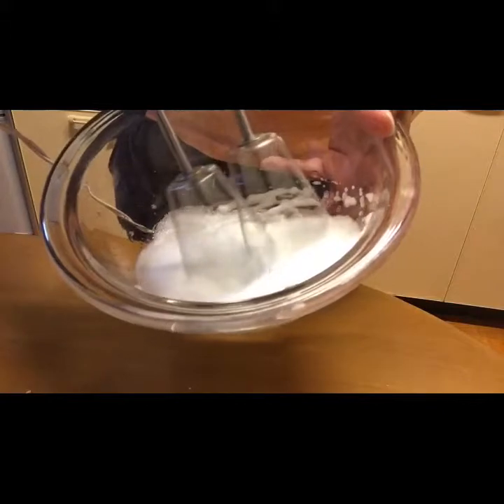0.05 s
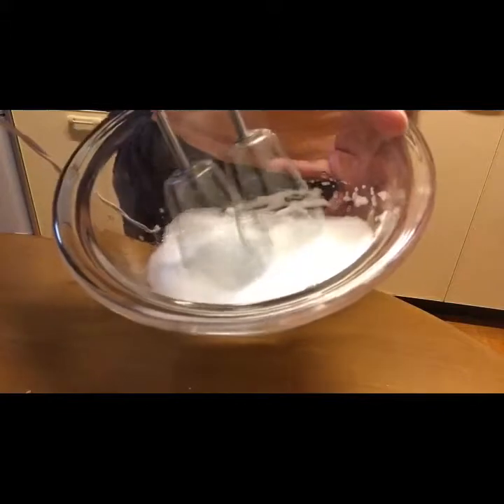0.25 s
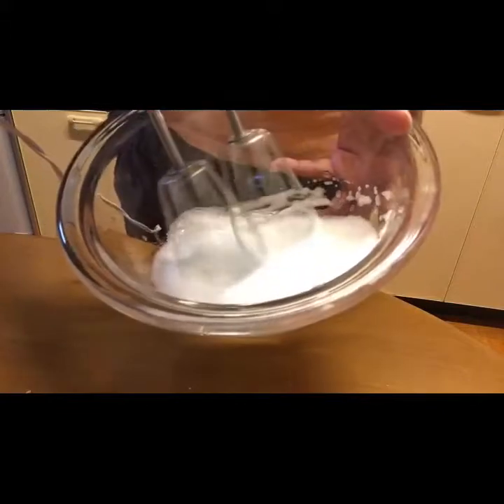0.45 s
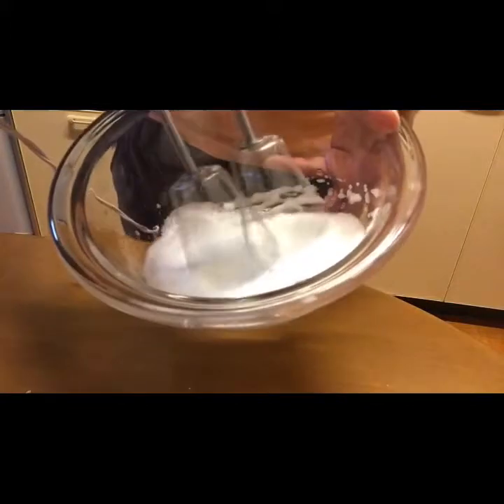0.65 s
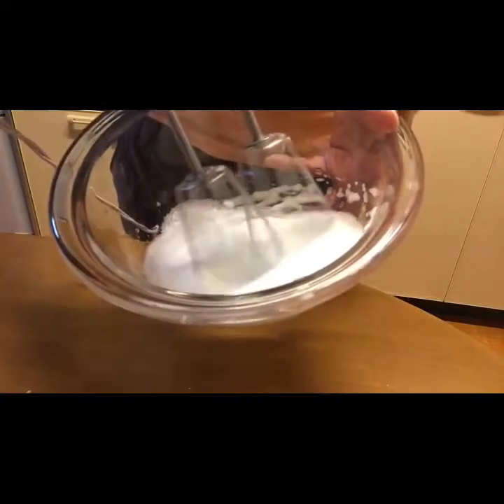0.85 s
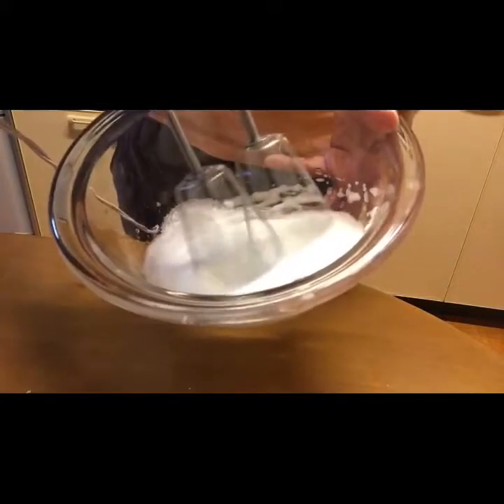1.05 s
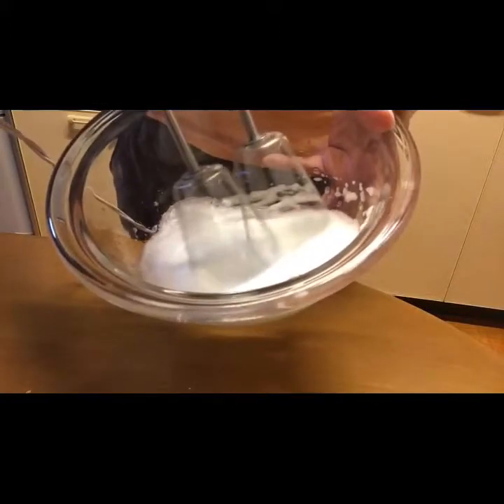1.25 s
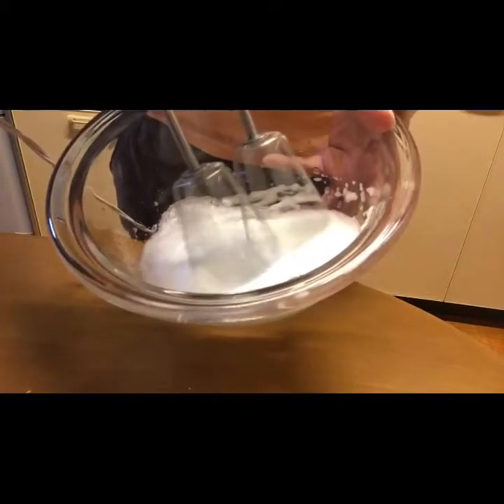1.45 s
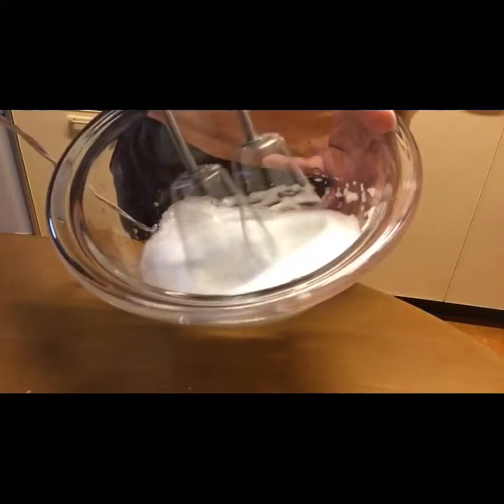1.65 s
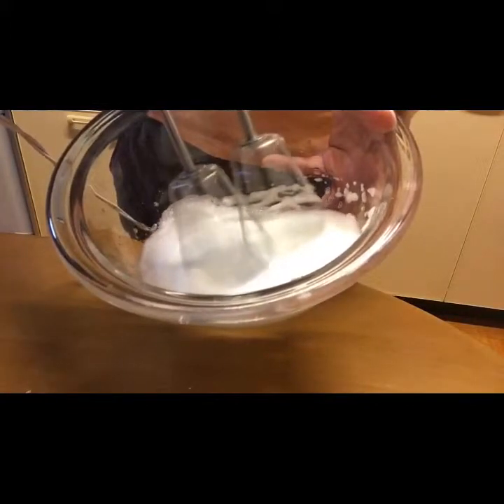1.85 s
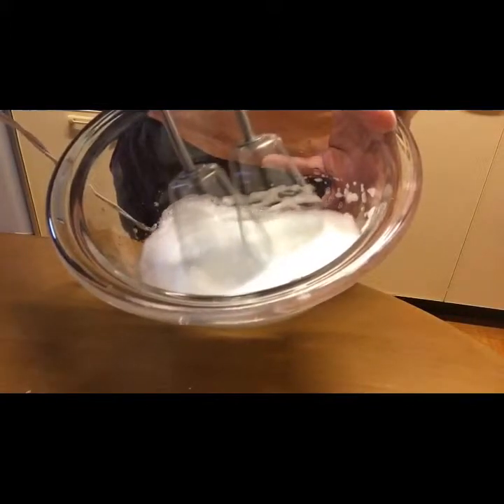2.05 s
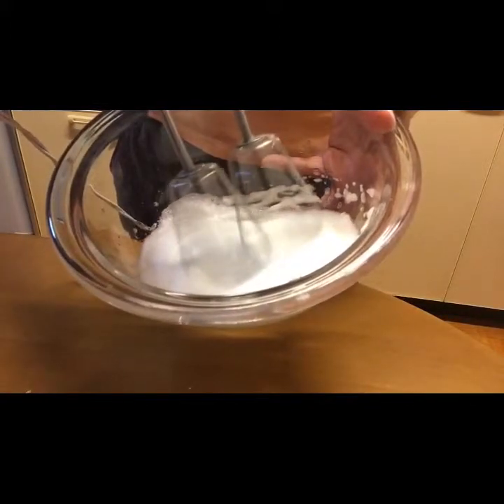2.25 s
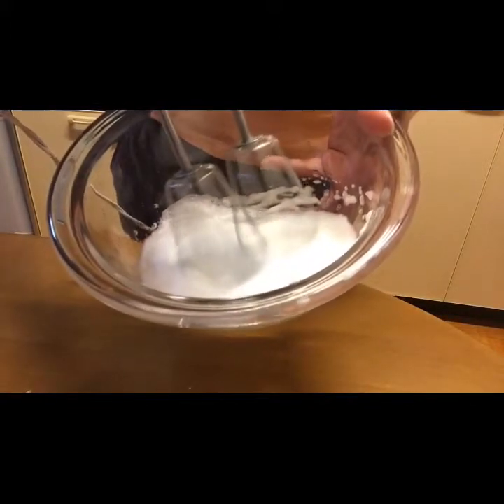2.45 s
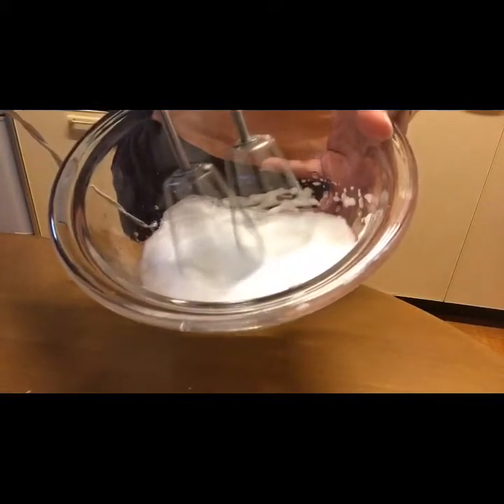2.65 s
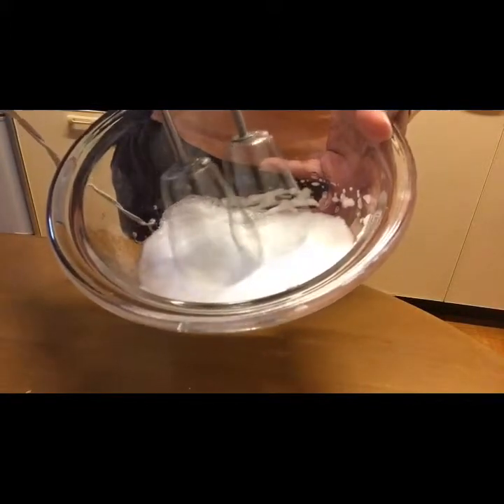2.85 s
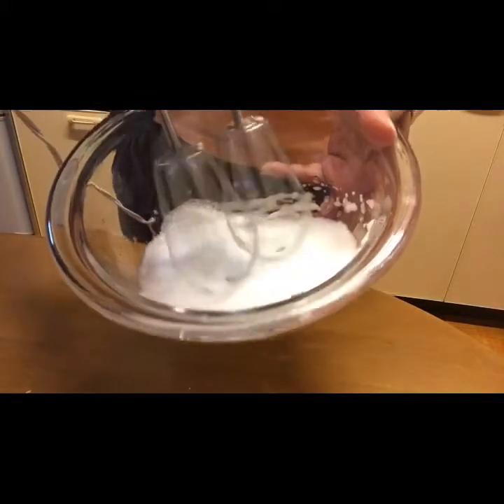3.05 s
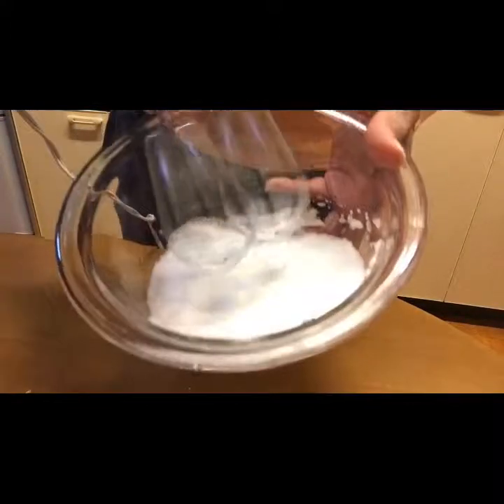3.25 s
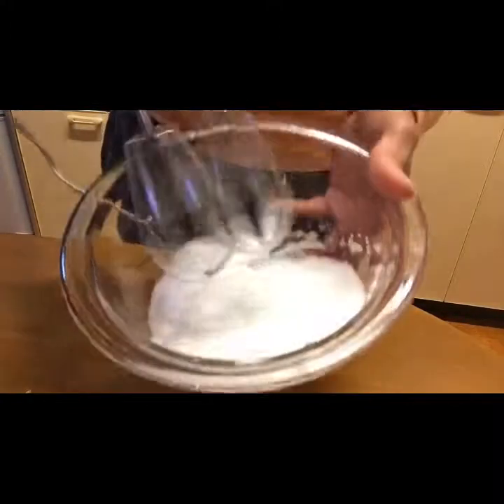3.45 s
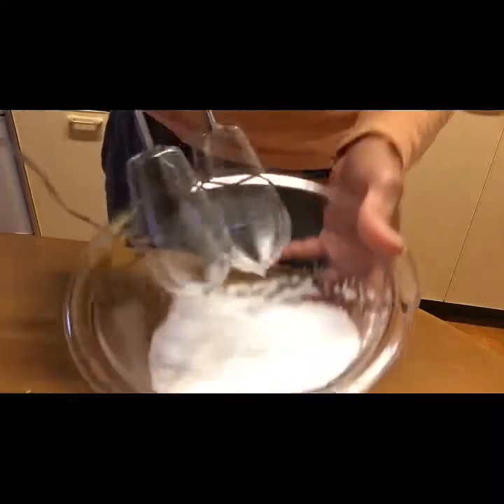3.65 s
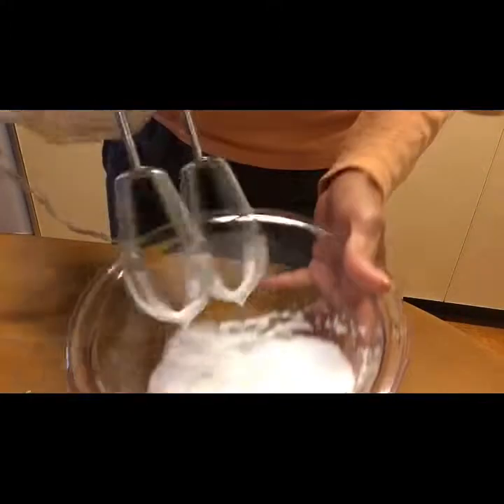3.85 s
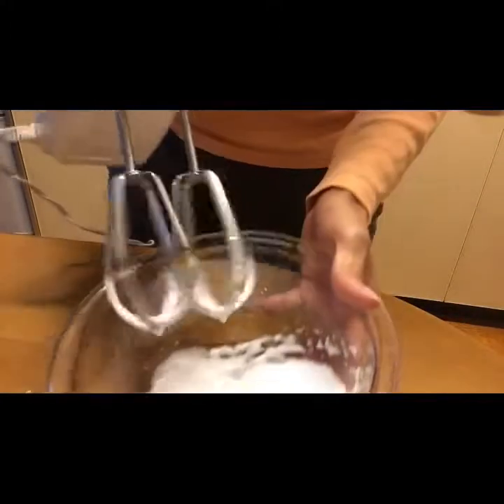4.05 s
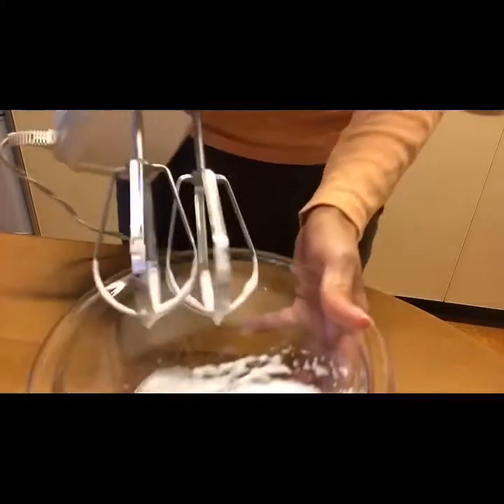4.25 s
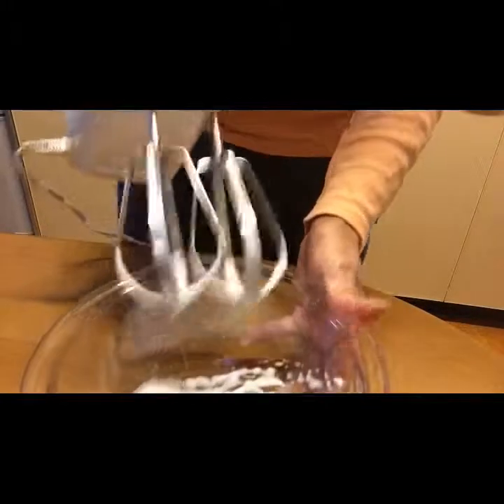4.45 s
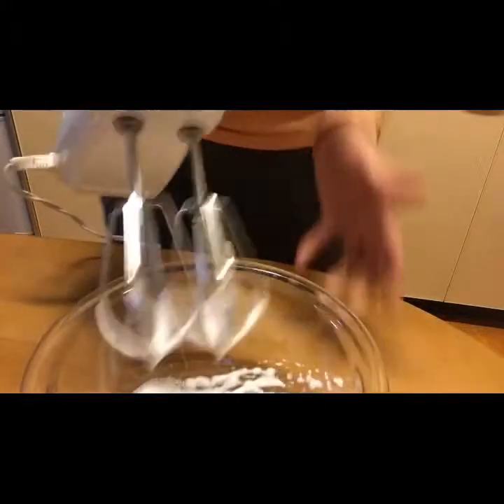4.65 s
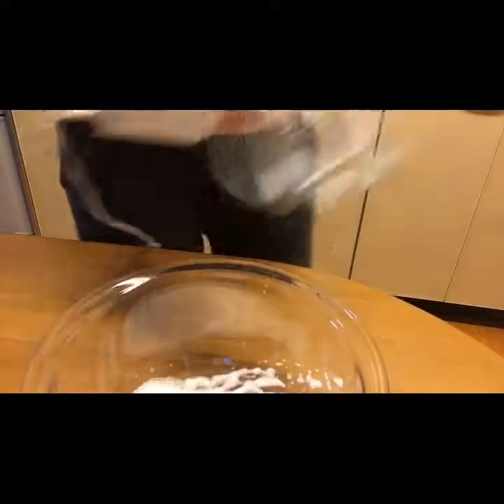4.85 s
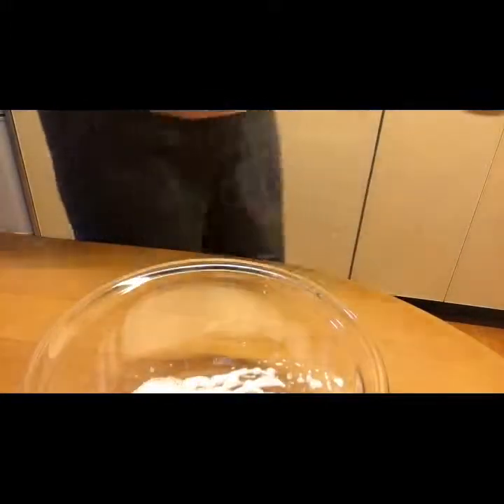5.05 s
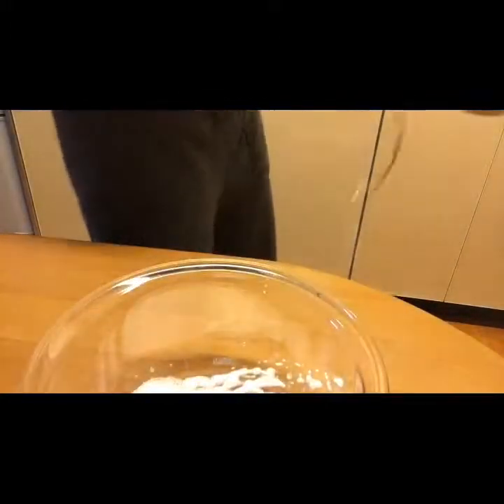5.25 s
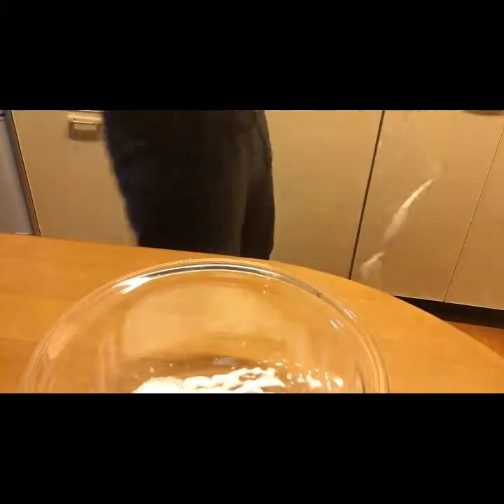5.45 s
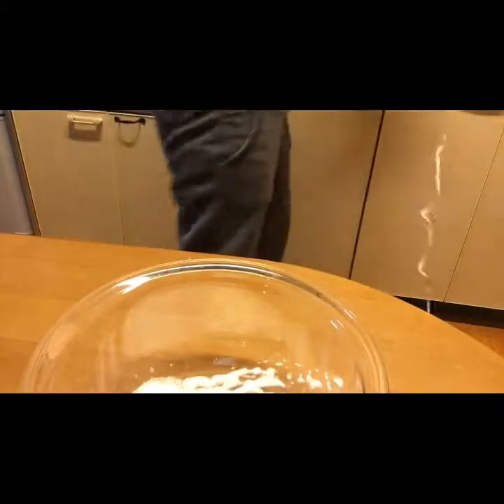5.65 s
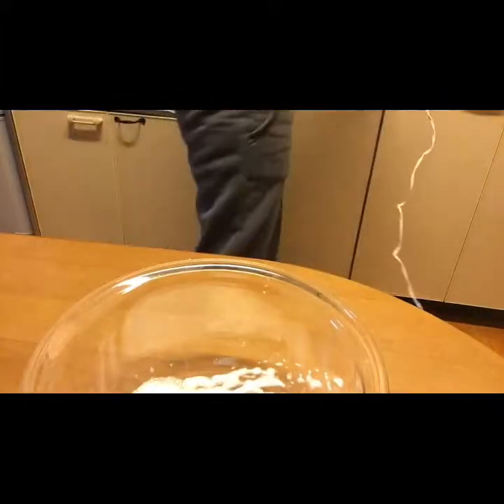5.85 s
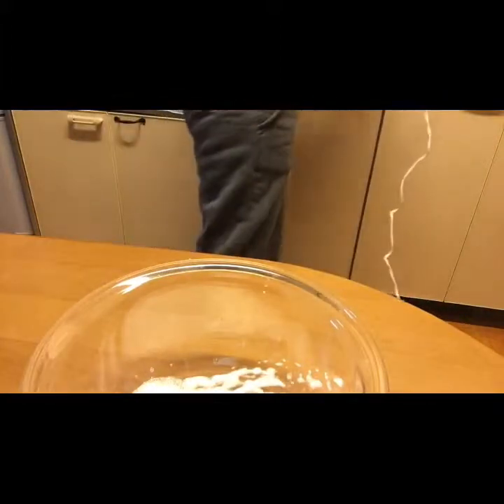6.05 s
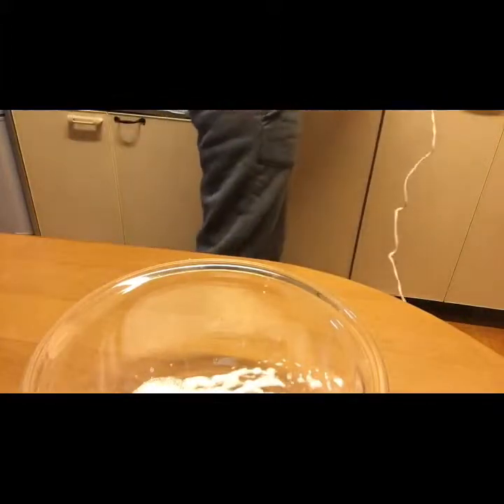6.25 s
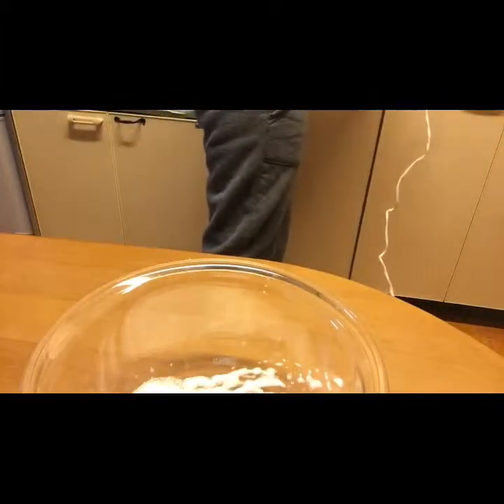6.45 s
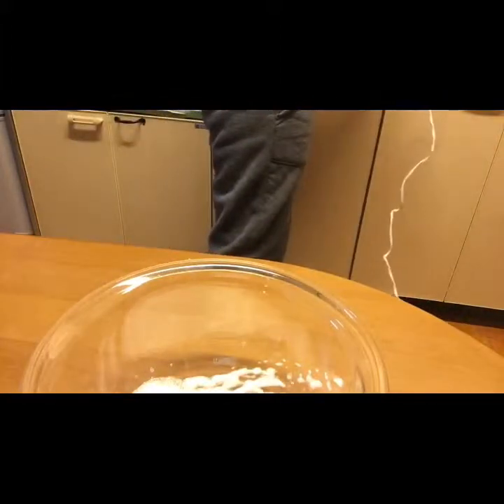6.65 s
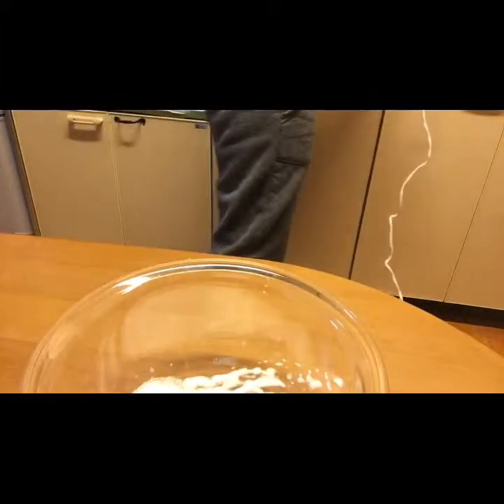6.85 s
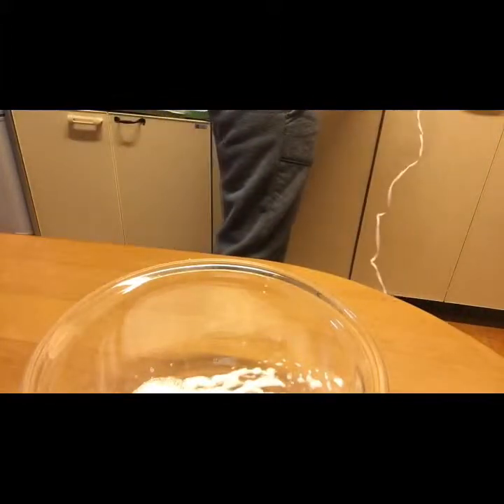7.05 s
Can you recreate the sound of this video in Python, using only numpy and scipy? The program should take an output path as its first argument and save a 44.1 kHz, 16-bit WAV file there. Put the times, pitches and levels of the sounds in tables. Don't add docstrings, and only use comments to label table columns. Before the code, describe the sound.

Whining mixer slows to a stop, glass clinks, two heavy bowl thumps on wood, then rustling clothes and small clacks over a faint kitchen hum.

```python
import sys
import numpy as np
from scipy import signal
from scipy.fft import rfft, irfft
from scipy.io import wavfile

SR = 44100
rng = np.random.default_rng(int(sys.argv[2]) if len(sys.argv) > 2 else 0)


def voltage_ratio(level):
    return 10 ** (np.asarray(level, float) / 20)


def output_pcm(signal):
    pcm = np.clip(np.atleast_2d(signal).T, -1, 1) * 32767
    wavfile.write(sys.argv[1], SR, np.round(pcm).astype(np.int16))


N = 313992
TIME = np.arange(N) / SR


def rms_one(x):
    return x / np.sqrt(np.mean(x ** 2) + 1e-20)


def noise():
    return rng.standard_normal(N)


def curve(rows):
    s, value = np.transpose(rows)
    return np.interp(TIME, s, value)


def band(x, low_hz, high_hz):
    sos = signal.butter(2, [low_hz, min(high_hz, .45 * SR)], "band", fs=SR, output="sos")
    return signal.sosfilt(sos, x + 1e-18)


def hump(x, centre_hz, width_hz):
    return rms_one(band(x, centre_hz - width_hz / 2, centre_hz + width_hz / 2))


def bell(hz, centre_hz, width_hz, power):
    return 1 / (1 + (2 * (hz - centre_hz) / width_hz) ** power)


def drift(rate_hz, step=1):
    r = np.exp(-2 * np.pi * rate_hz * step / SR)
    draws = rng.standard_normal((N + SR) // step + 2)
    slow = signal.lfilter([1], [1, -2 * r, r * r], draws)[SR // step:]
    return np.interp(np.arange(N) / step, np.arange(len(slow)), rms_one(slow))


def colour(x, spectrum, peaks):
    hz = np.arange(N // 2 + 1) * SR / N + 1
    at_hz, db = np.transpose(spectrum)
    level_db = np.interp(np.log(hz), np.log(at_hz), db)
    for centre_hz, width_hz, lift_db in peaks:
        level_db = level_db + lift_db * bell(hz, centre_hz, width_hz, 2)
    return rms_one(irfft(rfft(x) * voltage_ratio(level_db), N))


def ring(clicks, hz, t60):
    r, w = voltage_ratio(-60 / (t60 * SR)), 2 * np.pi * hz / SR
    return signal.lfilter([0, np.sin(w)], [1, -2 * r * np.cos(w), r * r], clicks + 1e-18)


def dying(s, t60):
    out, at = np.zeros(N), round(s * SR)
    out[at:at + SR // 2] = voltage_ratio(-60 * TIME[:SR // 2] / t60)[:N - at]
    return out


def swells(rows, rise_db_per_s, fall_db_per_s, rest_db):
    level_db = np.full(N, float(rest_db))
    for s, length_s, db in rows:
        early_s, late_s = np.maximum(s - TIME, 0), np.maximum(TIME - s - length_s, 0)
        level_db = np.maximum(level_db, db - rise_db_per_s * early_s - fall_db_per_s * late_s)
    return voltage_ratio(level_db)


def appliance_drone():
    # frequency in Hz, level in dB per Hz.
    spectrum = [(12, -56), (20, -26.5), (81, -18), (171, 0.5), (307, -14.5), (353, -13.5), (669, -22),
                (814, -18), (1050, -24.5), (1540, -20.5), (4980, -41.5), (6050, -41), (10300, -57.5),
                (14000, -54.5), (15600, -62)]
    # resonance in Hz, width in Hz, lift in dB.
    peaks = [(150.2, 8.8, 3), (170.3, 13, 8), (815, 46, 3), (1400, 240, 4.5)]
    return voltage_ratio(-51.5 + 0.53 * drift(6.8, step=50)) * colour(noise(), spectrum, peaks)


def kitchen(x):
    # band centre in Hz, t60 in seconds.
    decays = [(100, 0.55), (1000, 0.27), (4000, 0.19), (12000, 0.13)]
    t, tail = np.arange(SR // 2) / SR, 0
    for hz, t60 in decays:
        echoes = band(rng.standard_normal(len(t)), hz / 2.3, hz * 4.1)
        tail = tail + echoes * voltage_ratio(-60 * t / t60) * (t > .004)
    return signal.fftconvolve(x, tail / np.sqrt(np.sum(tail ** 2)))[:N]


def moving_about():
    # frequency in Hz, level in dB per Hz.
    cloth_spectrum = [(530, -18), (900, -3), (1020, -1), (1070, -3.5), (1530, -2), (1750, -2.5), (2170, -5),
                      (4570, -7.5), (16000, -37.5)]
    # start in seconds, length in seconds, level in dB, crisp top in dB.
    moves = [(3.95, 0.7, -62.5, -77), (4.85, .05, -59, -73), (4.9, 0.16, -60.5, -77),
             (5.115, 0.14, -67.5, -75), (5.5, .15, -62, -87), (5.65, 0.17, -65, -91),
             (5.81, .22, -62.5, -69), (6.03, 0.11, -72, -76), (6.778, 0.059, -69, -88),
             (7.09, .1, -72, -90)]
    # time in seconds, level in dB.
    steps = [(4.0, -55), (4.4, -47), (5.35, -62), (5.58, -52), (6.42, -42), (6.84, -54), (6.95, -55),
             (7.079, -57)]
    cloth_rise, cloth_fall, step_rise, step_fall = 600, 350, 200, 75
    cloth = colour(noise() * voltage_ratio(1.3 * drift(150)), cloth_spectrum, [])
    rustling = swells([row[:3] for row in moves], cloth_rise, cloth_fall, -81.5)
    crisp_rows = [(s, length_s, top_db) for s, length_s, _, top_db in moves]
    crisp = rms_one(band(cloth, 6300, 15000)) * swells(crisp_rows, cloth_rise, cloth_fall, -93)
    giving = swells([(s, 0, db) for s, db in steps], step_rise, step_fall, -74)
    boards = giving * rms_one(band(noise(), 45, 120))
    groan = hump(noise(), 351, 28) * swells([(5.75, .27, -59)], step_rise, cloth_fall, -90)
    fade_in = np.clip((TIME - 3.8) / 0.14, 0, 1)
    return fade_in * (voltage_ratio(3.0) * rustling * cloth + crisp + boards + groan)


def knocks():
    # time in seconds, level near 1.5 kHz in dB,
    # thud under 500 Hz in dB, brightness near 4 kHz in dB, t60 in seconds.
    dull = [(3.7206, -55, -43, -4, 0.16), (3.7618, -27.5, -44, -13.5, 0.09), (4.6747, -42, -64, -13, 0.068),
            (4.9024, -40.5, -50, -6, 0.28), (5.1646, -33.5, -48, -19, 0.17),
            (6.9057, -39.5, -59, -18, 0.16), (7.0768, -50.5, -43.5, -12.5, 0.17)]
    bright = [(4.7073, -33, -59, -30, 0.11), (4.7294, -61, -56, -7, 0.11), (4.9716, -17, -44, -12.5, 0.055),
              (6.0107, -28.5, -54, -14, 0.15), (6.0131, -30.5, -53, -11, 0.33),
              (6.338, -51, -67.5, -15, 0.14), (6.3782, -33.5, -34.5, -22, 0.27)]
    # low edge in Hz, high edge in Hz.
    ranges_hz = [(935, 2100), (89.3, 640), (2400, 4960), (5200, 7900), (8600, 14000)]
    lasting, trims_db = (0.95, 1.57, 0.84, 0.69, .55), (-11, -4, -2, -3.5, -16)
    rows = []
    for table, top in ((dull, 2.6), (bright, 1)):
        for s, db, thud_db, bright_db, t60 in table:
            top_db = db + top * bright_db
            rows.append((s, (db, thud_db, db + bright_db, top_db, top_db), t60))
    out = 0
    for k, ((low_hz, high_hz), last, trim_db) in enumerate(zip(ranges_hz, lasting, trims_db)):
        bursts = sum(voltage_ratio(levels_db[k] + trim_db) * dying(s, last * t60) for s, levels_db, t60 in rows)
        burst = band(bursts * noise(), low_hz, high_hz)
        out = out + band(burst, 0.63 * low_hz, 1.64 * high_hz) * np.sqrt(SR / 2 / (high_hz - low_hz))
    return out


def clacks():
    # start in seconds, frequency in Hz, level in dB, t60 in seconds.
    notes_left = [(4.675, 4600, -53, 0.039), (4.711, 1400, -46, .06), (4.97, 1520, -27.5, 0.03),
                  (4.972, 1890, -28.5, 0.065), (4.969, 1290, -30, 0.046), (5.171, 262, -32.5, 0.056),
                  (5.168, 1350, -48.5, 0.23), (5.168, 3400, -54, .15), (5.168, 4500, -58, .15),
                  (6.011, 1850, -38, 0.16), (6.013, 3600, -45, 0.29), (6.015, 6900, -25.5, 0.014),
                  (6.381, 184.6, -31.5, 0.38), (6.382, 349, -45, 0.57)]
    return sum(voltage_ratio(level_db) * dying(s, t60) * np.sin(2 * np.pi * hz * (TIME - s))
               for s, hz, level_db, t60 in notes_left)


def thumps():
    landings_s = [
        4.0155,
        4.4224,
    ]
    # blow in dB, crack in Hz, body noise in dB, glass rattle in dB, rattle length in seconds.
    blows = [
        (-5, 850, -12.5, -35.5, 0.054),
        (-6.5, 983, -19.5, -37.5, 0.013),
    ]
    # frequency in Hz, level in dB, t60 in seconds.
    first_edge = [(146.3, 6, 0.21), (194, -7, 0.24), (388.4, 5, 0.18), (516.5, -29, 0.25),
                  (680, -14.5, 0.25), (856, -16, 0.23), (1620, -25, 0.19), (2040, -30, 0.24),
                  (2560, -25, 0.29), (2730, -38, 0.27)]
    second_edge = [(142, -10, 0.32), (244, -12, 0.092), (384, -13, 0.26), (667, -3, 0.085), (902, -3, 0.12),
                   (1114, -9, 0.22), (1599, -32, 0.27), (1940, -3, 0.074), (2300, -33, 0.14),
                   (3000, -31, 0.14)]
    # frequency in Hz, width in Hz, level in dB.
    glass = [(3424, 300, -4), (4600, 250, -2), (5650, 500, 3), (6200, 400, 1), (6750, 400, -4),
             (8500, 1200, -7), (13500, 4000, -10)]
    contacts = ((0, -.35), (.0011, 1), (.003, -.6), (.0055, .35))
    out, hiss = np.zeros(N), noise()
    chatter = sum(voltage_ratio(db) * hump(hiss, hz, width_hz) for hz, width_hz, db in glass)
    chatter = rms_one(chatter + voltage_ratio(-2.0) * rms_one(band(hiss, 920, 8000)))
    for s, row, modes in zip(landings_s, blows, (first_edge, second_edge)):
        blow_db, crack_hz, body_db, rattle_db, length_s = row
        blow = np.zeros(N)
        for late_s, push in contacts:
            blow[round((s + late_s) * SR):][:16] = push * np.hanning(16) / 8
        crack = ring(blow, crack_hz, .025)
        crack = crack - voltage_ratio(-3) * ring(blow, crack_hz * 1.7, .025)
        crack = crack + voltage_ratio(-7) * ring(blow, crack_hz * 2.7, .015)
        out += voltage_ratio(blow_db) * crack
        for k, (hz, db, t60) in enumerate(modes):
            out += (-1) ** k * voltage_ratio(blow_db + db - 11) * ring(blow, hz, t60)
        out += voltage_ratio(blow_db - 15.5) * ring(blow, 63.3, 0.51)
        body = rms_one(band(noise(), 142, crack_hz * 0.69))
        body = body + voltage_ratio(-9.5) * rms_one(band(noise(), 540, crack_hz * 2.16))
        out += voltage_ratio(body_db) * band(body * dying(s + 0.00197, 0.2), 95, 5800)
        fall_db = -400 * np.maximum(TIME - s - length_s, 0) - 60 * (TIME - s).clip(0, 1)
        rocking = (TIME > s + .002) * voltage_ratio(fall_db)
        out += voltage_ratio(rattle_db) * rocking * chatter
    return out


def ticks():
    # time in seconds, peak in dB, share that rings in the metal (0-1).
    spatters = [(0.456, -20, 0.1), (1.6097, -12.5, 0.1), (2.0284, -12, 0), (2.3592, -12.5, 0.26),
                (2.582, -19.5, 0.4)]
    clinks = [(2.4244, -24.5, 0.6), (2.4924, -20, 0.76), (2.5399, -23.5, 0.96), (2.6055, -24.5, 0.7),
              (2.6374, -20.5, 0.7), (2.658, -24, 0.8), (2.683, -23, 0.6), (2.6951, -19, 0.64),
              (2.7156, -19, 0.8), (2.8067, -19.5, 0.6), (2.8187, -24, 0.8), (2.864, -35, 0.9),
              (2.8958, -24.5, 0.75)]
    # frequency in Hz, level in dB, t60 in seconds.
    modes = [(995, 9, .14), (1090, 8, .08), (800, 6, .05), (1600, 8, .04), (3000, 9, .04), (3450, 9, .04),
             (4600, 6, .04), (5400, 4, .05), (6600, 4, .06), (8650, -3, .07), (9270, -2, .08),
             (9710, -6, .07), (10610, -4, .08), (13660, -7, .04), (14300, -12, .04)]
    s, peak_db, share = np.array(spatters + clinks).T
    at, out = (s * SR).astype(int), np.zeros(N)
    share = np.clip(share, 0, 1)
    spread_db = rng.normal(0, 3.5, (len(at), len(modes)))
    for k, (hz, level_db, t60) in enumerate(modes):
        clicks = np.zeros(N)
        clicks[at] = share * voltage_ratio(peak_db + level_db - 12.5 + spread_db[:, k])
        out += ring(clicks, hz, t60)
    snaps = sum((1 - part) * voltage_ratio(db - 3.0) * dying(start, 0.012)
                for start, db, part in zip(s, peak_db, share))
    return out + snaps * band(noise(), 4400, 16400)


def rubbing(slowed_db):
    # frequency in Hz, width in Hz, level in dB.
    frame = [(1222, 230, -38), (4400, 500, -46.5), (12000, 6100, -58)]
    hiss = noise()
    friction = sum(voltage_ratio(db) * hump(hiss, hz, width_hz) for hz, width_hz, db in frame)
    return voltage_ratio(1.27 * slowed_db) * friction


def whine(turns, speed, slowed_db):
    # multiple of the rotor rate, level at full speed in dB, dB lost per dB of speed,
    # change once the mixer is turned in dB, gain at the critical speed in dB.
    orders = [(1, -17, .4, 1.5, 5), (2, -35, 1.6, -4, 0), (3, -47, .8, -3, 5), (4, -43, 1.0, 1, 0),
              (6, -51, .9, 1.5, 0), (9, -30.5, 2.6, -9, 0), (12, -46, 2.2, -3, 0), (24, -59, .6, -2, 15),
              (36, -56, 1.5, -7, 11), (48, -70, .1, 0, 0), (72, -70, .6, 0, 0), (96, -73, .35, 0, 0)]
    # frequency in Hz, width in Hz, lift in dB.
    passages = [(890, 110, -15), (985, 60, 5), (1125, 200, 13), (1380, 150, 6), (3120, 260, 7)]
    turned = np.clip((TIME - 1.03) / .06 + .5, 0, 1)
    shaking = bell(speed, 324, 28, 4)
    out = 0
    for multiple, full_db, law, turn_db, shake_db in orders:
        hz = multiple * speed
        level_db = full_db + law * slowed_db + turn_db * turned + shake_db * shaking
        for at_hz, width_hz, lift_db in passages:
            level_db = level_db + lift_db * bell(hz, at_hz, width_hz, 4)
        wobble = voltage_ratio(np.log(2 + multiple) * .7 * drift(10, step=50))
        cycles = multiple * turns + rng.random() + .04 * drift(12, step=50)
        radiated = np.minimum(hz / 780, 1) ** 4
        tone = wobble * np.sin(2 * np.pi * cycles)
        out = out + (hz < .4 * SR) * radiated * voltage_ratio(level_db) * np.sqrt(2) * tone
    return out * np.clip((4 - TIME) / .1, 0, 1)


def roar(turns, slowed_db):
    # frequency in Hz, level in dB per Hz.
    spectrum = [(24, -77.5), (40, -29.5), (369, -7.5), (498, -13.5), (742, -11.5), (906, -15), (1110, -8.5),
                (1190, -10.5), (1460, -5), (1960, -8.5), (3000, -5), (3850, -12), (5330, -12.5),
                (8570, -23), (15600, -32)]
    # frequency in Hz, width in Hz, lift in dB.
    housing = [(365, 160, 1), (627, 120, 6.5), (1016, 51, 6), (1440, 880, 4), (2070, 62, 5),
               (2509, 71, 7.5), (3049, 300, 5), (4260, 27, 8.5), (4507, 150, 7), (5020, 170, -8.5),
               (5276, 210, 5), (8540, 435, -3), (9250, 250, 2.5), (10260, 300, -10), (511, 39, -8)]
    # level at full speed in dB, dB lost per dB of speed, share of the cream's drag.
    layers = [
        (-27.5, 1.78, 0.2),
        (-23.5, 2.5, -0.026),
        (-33, 3.5, .1),
        (-22.5, 7, 0.93),
    ]
    # time in seconds, drag in dB.
    drag = [(0, -3.5), (.41, -6), (.61, -3), (.99, -3), (1.57, -3), (1.9, -1.5), (2.44, 0.5), (3.06, 10.5),
            (3.3, -5)]
    throb_db = np.sin(2 * np.pi * turns) + drift(46, step=20) + 0.72 * drift(4.4, step=50)
    rattle = noise() * voltage_ratio(throb_db + 0.77 * drift(860))
    bins, hz = rfft(colour(rattle, spectrum, housing)), np.arange(N // 2 + 1) * SR / N
    low, top = 1 / (1 + (hz / 2000) ** 4), 1 / (1 + (6000 / (hz + 1)) ** 4)
    parts = [irfft(bins * share, N) for share in (low, 1 - low - top, top)]
    beat = (turns / 26.8 + .035) % 1
    binding = noise() * voltage_ratio(-11 * beat * (1 + .3 * drift(8, step=50)))
    parts.append(hump(binding, 3050, 160))
    drag_db = curve(drag)
    gains = [voltage_ratio(full_db + law * slowed_db + share * drag_db) for full_db, law, share in layers]
    gains[2] = np.hypot(gains[2], voltage_ratio(-68.5))
    stopped = np.clip((4.25 - TIME) / 0.25, 0, 1)
    return stopped * sum(rms_one(part) * gain for part, gain in zip(parts, gains))


def scene():
    # time in seconds, speed in turns per second.
    rotor = [(0, 370.2), (1.55, 370.2), (1.8, 359.5), (2.2, 333.5), (2.54, 299), (2.75, 260), (3.17, 186),
             (3.5, 131.5), (3.9, 70), (4.3, 15)]
    speed = curve(rotor)
    slowed_db = 20 * np.log10(speed / 370.2)
    turns = np.cumsum(speed * (1 + .0005 * drift(2.1, step=50))) / SR
    hits = band(ticks(), 500, 19000) + band(thumps(), 45, 19000) + knocks() + clacks()
    mixer = roar(turns, slowed_db) + whine(turns, speed, slowed_db) + rubbing(slowed_db)
    mono = mixer + hits + voltage_ratio(-14) * kitchen(hits) + moving_about() + appliance_drone()
    return np.array([mono, mono])


def top_cut(x):
    return signal.sosfilt(signal.butter(12, 16690, fs=SR, output="sos"), x)


def record(dry):
    ceiling = .79
    held = dry / (1 + np.abs(dry / ceiling) ** 6) ** (1 / 6)
    low_pass = signal.ellip(12, .5, 80, 15680, fs=SR, output="sos")
    return top_cut(signal.sosfilt(low_pass, held))


dry = scene()
out = record(dry)
output_pcm(out)
```